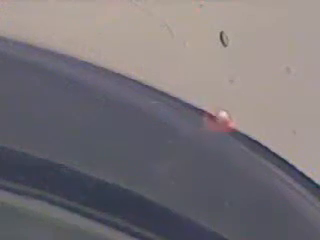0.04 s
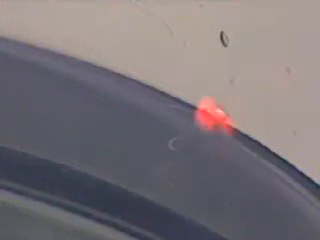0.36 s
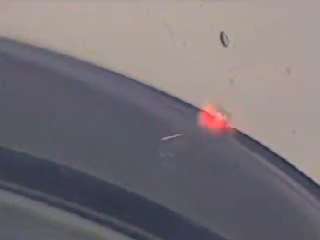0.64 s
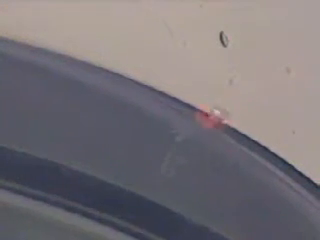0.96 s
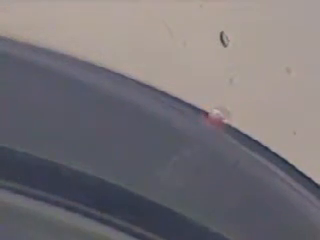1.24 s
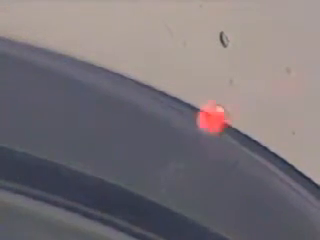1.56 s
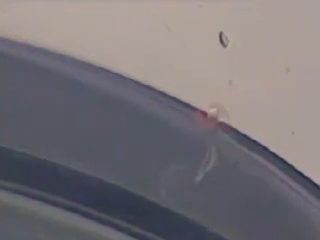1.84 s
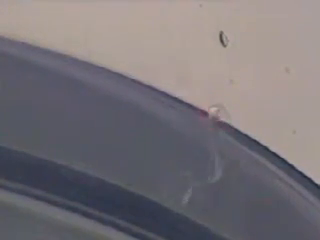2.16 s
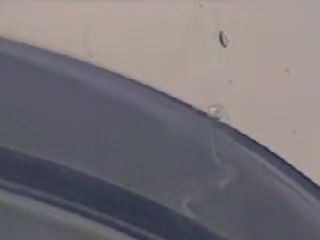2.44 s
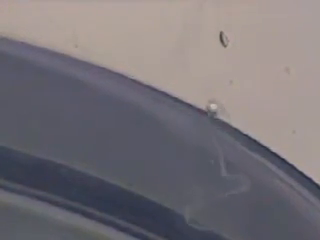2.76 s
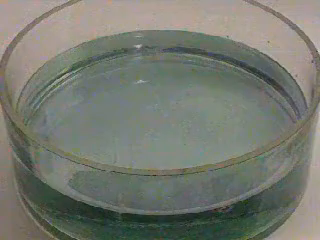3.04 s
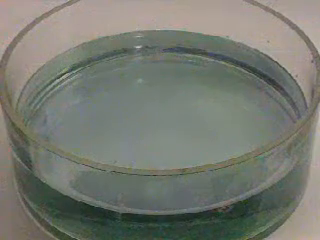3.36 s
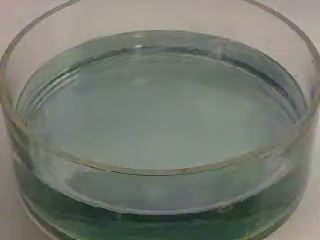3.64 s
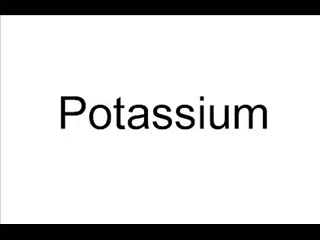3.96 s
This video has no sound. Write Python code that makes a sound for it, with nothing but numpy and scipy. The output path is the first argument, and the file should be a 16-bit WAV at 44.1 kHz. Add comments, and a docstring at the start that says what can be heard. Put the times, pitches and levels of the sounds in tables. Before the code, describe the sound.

A bead of reactive metal fizzes on water in a glass dish, close up, over a low room hum. Soft flame puffs and sharp droplet snaps dot the first second. The sizzle shifts tone at 1.4 and 3 seconds, sputters with more puffs around 2.3, then swells. At 3.4 seconds one loud, slightly distorted pop ends it, and a few specks tick faintly against the glass.

```python
"""A bead of reactive metal fizzes on water in a glass dish, near a small microphone in a humming room.
From the start, tiny gas bursts sizzle, the gas spurts, the flame puffs and droplets snap.
At 1.43 s and 3.03 s the sizzle changes colour abruptly.
At 3.41 s the bead ends in one overloading pop; then a few specks fall back and ring the glass."""
import sys
import numpy as np
from scipy import signal
from scipy.fft import rfft, irfft
from scipy.io import wavfile
from scipy.ndimage import map_coordinates

SR = 44100
rng = np.random.default_rng(int(sys.argv[2]) if len(sys.argv) > 2 else 0)


def file_out(sig):
    """Save sig as 16-bit WAV at sys.argv[1]."""
    # one column per channel
    cols = np.atleast_2d(sig).T
    # limit, then scale
    lim = np.clip(cols, -1, 1)
    pcm = np.round(lim * 32767).astype(np.int16)
    wavfile.write(sys.argv[1], SR, pcm)


N = 176400

# reaction vigour (time [s], level [dB])
VIGOUR = [(0, -26), (.15, -27), (.45, -26.5), (.6, -28.5), (.95, -27), (1.25, -29), (1.42, -27.5),
          (1.485, -31.5), (1.53, -27.5), (1.7, -23.5), (1.78, -26), (1.84, -30), (2.08, -29), (2.22, -33),
          (2.41, -33.5), (2.445, -21), (2.48, -25.5), (2.88, -24.5), (3.0, -26), (3.08, -28), (3.4, -29)]
# gas spurts (time [s], hold [s], level [dB])
SPURTS = [(0.303, 0.015, -28.5), (0.705, 0.016, -24.5), (1.492, 0.006, -23), (1.769, 0.012, -28),
          (1.909, 0.015, -22), (2.124, .007, -25), (2.255, 0.011, -20), (2.313, 0.006, -21),
          (2.371, 0.0087, -19), (2.578, 0.0042, -22.5), (3.048, 0.0097, -25)]
# sizzle echoes off the dish (delay [s], gain [ratio])
DISH_ECHOES = [(.00193, -0.2), (.0027, -0.04), (.00405, -0.065)]
# flame puffs (time [s], pitch [Hz], level [dB])
PUFFS = [(.0625, 600, -19.5), (0.1177, 460, -13.5), (.788, 450, -18.5), (.835, 415, -20),
         (0.8855, 434, -13), (1.006, 515, -17.5), (1.173, 456, -17.5), (1.918, 760, -19),
         (2.2693, 1020, -11), (2.277, 736, -15), (2.3284, 710, -11), (2.3427, 750, -17)]
# flame flutters (time [s], hold [s], level [dB])
FLUTTERS = [(0.113, 0.034, -30), (0.777, 0.041, -33), (0.882, 0.055, -35.5), (2.264, 0.012, -24.5),
            (2.287, 0.037, -37), (2.315, 0.04, -28.5)]
# droplets, then specks (time [s], level [dB], relative ring [dB], relative scatter [dB], low cut [Hz])
SNAPS = [(0.142, -13, -19.5, -6, 500), (.446, -13, -23.5, -7.5, 500), (.6472, 5.5, -45, -19.5, 1514),
         (.651, -1.5, -46, -9.5, 3000), (1.033, -3, -36, -15, 1500), (1.0539, 2.5, -25.5, -7.5, 450),
         (1.0554, -1, -50, -17, 700), (1.0893, 0.5, -55, -22, 3000), (1.493, -10, -45, -21, 500),
         (2.2643, -11, -34, -14, 500), (2.908, -15, -37, -25, 500), (3.563, -20, -34, -6.5, 3000),
         (3.664, -27, -40, -10, 1000), (3.711, -19.5, -37, -10.5, 1000)]
# glass modes (frequency [Hz], level [dB], T60 [s])
GLASS_MODES = [(2159, 9.5, 0.22), (3040, -9, 0.54), (3634, 3, 0.087), (3965, 1, 0.21), (4430, -5, 0.19),
               (7430, -0.5, 0.099), (8830, -1, 0.21)]
# mains harmonics 1-4 (level [dB])
HUM_DB = (-30.5, -45.5, -47, -47)
# hum swell (time [s], gain [dB])
HUM_SWELL = [(0, -0.5), (1.4, 0.5), (2.7, 0.5), (3.4, 1), (4, -2.5)]

# spectral shapes (frequency [Hz], relative level [dB])
SIZZLE_SPECTRUM = [(120, -7.5), (300, -2), (600, -1), (1000, -2), (1500, 0.5), (2500, -3), (4200, -1),
                   (7000, -5), (9000, -11.5), (9800, -11), (10500, -33), (11700, -43), (12500, -15),
                   (13200, -29)]
FLAME_SPECTRUM = [(100, 3.5), (300, 5.5), (600, -5), (900, -6.5), (1500, -1.5), (2500, -13), (4000, -28),
                  (10000, -32)]
SNAP_SPECTRUM = [(200, -5), (900, -6.5), (1300, 1), (1700, 3.5), (2500, 7.5), (3700, 2.5), (5500, -3),
                 (7500, -3.5), (9300, -8), (10800, -21), (14000, -11)]
POP_SPECTRUM = [(30, -5), (70, 2.5), (250, 4), (600, -2.5), (1300, -2.5), (2300, -1.5), (3300, -5),
                (5500, -12), (9000, -13.5), (11000, -16.5), (12600, -17)]
TAIL_SPECTRUM = [(80, -8.5), (250, -4), (700, 0.5), (1200, 0), (2500, -2.5), (6000, -3.5), (9500, 1.5),
                 (12500, -0.5)]
RUMBLE_SPECTRUM = [(20, -13.5), (48, -1), (70, -0.5), (100, -1.5), (150, -1.5), (210, -3), (300, -11),
                   (450, -17.5), (700, -23.5), (1500, -28.5), (4000, -33), (9000, -38.5), (11000, -39),
                   (12500, -36.5)]
HISS_SPECTRUM = [(20, 14), (11500, -12), (13000, -14), (14000, -46)]
# overall band limit, with a hollow near 11 kHz (frequency [Hz], gain [dB])
BAND_SHAPE = [(20, -25), (45, 0), (9300, -1.5), (10700, -12.5), (11700, -9), (12700, 3.5), (13400, -50),
              (16000, -55)]

# peaks and dips of the dish (centre [Hz], width [Hz], gain [dB])
COLOUR_1_PEAKS = [(755, 23, 8), (883, 200, -6.5), (1130, 81, 4.5), (1740, 70, -9), (1946, 103, 9.5),
                  (2196, 164, 6.5), (2420, 44, -7), (2680, 90, 2), (3000, 48, -9), (3220, 64, -9),
                  (3880, 400, 2), (4820, 180, -4)]
COLOUR_2_PEAKS = [(593, 236, -6.5), (820, 110, 0.5), (990, 70, -4), (1500, 160, 2), (1970, 85, -4),
                  (2300, 104, 7.5), (2550, 210, 5.5), (2945, 120, -4.5), (3420, 160, 3.5)]
COLOUR_3_PEAKS = [(834, 120, 0), (1260, 113, -14), (2370, 810, 4.5), (3200, 130, 0), (3490, 150, -8),
                  (4230, 300, 2.5)]
RIM_PEAKS = [(8000, 200, -2), (8750, 220, 5)]  # common to all three sizzle colours
SNAP_PEAKS = [(2190, 120, 1.5), (3020, 210, -8.5), (3990, 280, 4), (4900, 200, -2), (6990, 300, 3),
              (7950, 200, -5)]
POP_PEAKS = [(316, 32, -5), (418, 37, 5.5), (520, 27, -2), (596, 47, 6.5), (700, 37, -11), (790, 54, 9),
             (957, 25, 7.5), (1156, 30, 6), (1190, 38, -6.5), (1586, 96, 1), (1780, 37, 5), (1906, 39, 4),
             (2035, 24, 6), (2140, 45, 1.5), (2350, 60, 2), (2402, 60, 2), (2645, 43, 4.5)]
# room resonances (centre [Hz], width [Hz], gain [dB])
ROOM_PEAKS = [(144.3, 13, 4.5), (401, 31, 2)]

CUTS_S, POP_S = (1.43, 3.03), 3.4108
DRIFT_PER_S = (-.085, .033, .001)  # relative glide of each sizzle colour
TIME_S = np.arange(N) / SR


def undb(db):
    """Decibels to gain."""
    return 10 ** (np.asarray(db) / 20)


def unit(x):
    """Scale to rms 1."""
    return x / np.sqrt(np.mean(x ** 2))


def colour(x, spectrum=((1, 0),), peaks=()):
    """Minimum-phase filter: spectrum (default flat) plus bell-shaped peaks and dips."""
    bins_hz = np.arange(N + 1) * SR / (2 * N)
    hz, db = np.array(spectrum).T
    curve_db = np.interp(np.log(bins_hz + 1), np.log(hz), db)
    curve_db += sum(gain * np.exp(-((bins_hz - centre) / width) ** 2) for centre, width, gain in peaks)
    cepstrum = irfft(np.log(undb(curve_db)))
    cepstrum[1:N] *= 2
    cepstrum[N + 1:] = 0
    return irfft(rfft(x, 2 * N) * np.exp(rfft(cepstrum)))[:N]


def noise(spectrum, peaks=()):
    """Coloured noise, rms 1."""
    return unit(colour(rng.standard_normal(N), spectrum, peaks))


def walk(rate_hz):
    """Random wander, spread near 1."""
    knots = rng.standard_normal(4096)
    return np.interp(TIME_S * rate_hz, np.arange(len(knots)), knots)


def gate(start_s, hold_s, attack_s, release_s):
    """Linear rise; exponential release from hold_s after the start."""
    age_s = TIME_S - start_s
    return np.clip(age_s / attack_s, 0, 1) * np.exp(-np.maximum(age_s - hold_s, 0) / release_s)


def glide(x, drift_per_s, centre_s):
    """Slide all frequencies linearly; unchanged at centre_s."""
    read_s = TIME_S + drift_per_s * (TIME_S - centre_s) ** 2 / 2
    return map_coordinates(x, [read_s * SR], mode="mirror")


def add(out, start_s, sound):
    """Mix in at start_s."""
    i = int(start_s * SR)
    out[i:i + len(sound)] += sound[:N - i]


def gas(bursts_per_s=2600, spread_db=2.5, hiss_db=-5.5):
    """Tiny bursts over gas hiss, with short echoes off the dish."""
    sizes = undb(spread_db * np.minimum(rng.exponential(size=N), 5)) * rng.choice([-1, 1], N)
    bursts = unit((rng.random(N) < bursts_per_s / SR) * sizes)
    direct = bursts + undb(hiss_db) * rng.standard_normal(N)
    return direct + sum(gain * np.interp(TIME_S - delay_s, TIME_S, direct, left=0)
                        for delay_s, gain in DISH_ECHOES)


def singing(start_hz=2322, width_hz=105, fade_s=0.7):
    """Resonance by the bead: narrow noise that sinks and fades."""
    band_hz = [start_hz - width_hz / 2, start_hz + width_hz / 2]
    bandpass = signal.butter(2, band_hz, "band", fs=SR, output="sos")
    tone = unit(signal.sosfilt(bandpass, rng.standard_normal(N)))
    return glide(tone, DRIFT_PER_S[0], centre_s=0) * np.exp(-(TIME_S / fade_s) ** 2)


def sizzle():
    """Gas in three successive colours, switched abruptly; level follows vigour and spurts."""
    source = gas()
    out = undb(-4.5) * singing()
    edges_s = (0, *CUTS_S, POP_S)
    colours = (COLOUR_1_PEAKS, COLOUR_2_PEAKS, COLOUR_3_PEAKS)
    for start_s, end_s, peaks, drift in zip(edges_s, edges_s[1:], colours, DRIFT_PER_S):
        drifting = glide(colour(source, peaks=peaks), drift, (start_s + end_s) / 2)
        span = gate(start_s, end_s - start_s, attack_s=0.00072, release_s=0.0015)
        out += unit(colour(drifting, SIZZLE_SPECTRUM, RIM_PEAKS)) * span
    vigour = undb(np.interp(TIME_S, *np.array(VIGOUR).T) + 1.07 * walk(rate_hz=90))
    spurts = sum(undb(db) * gate(start_s, hold_s, attack_s=0.0024, release_s=0.0052)
                 for start_s, hold_s, db in SPURTS)
    return out * np.hypot(vigour, spurts)


def thump(age_s, start_hz=468, end_hz=115, glide_s=0.00294):
    """Low body of the pop: a sine dropping in pitch."""
    cycles = end_hz * age_s + (start_hz - end_hz) * glide_s * (1 - np.exp(-age_s / glide_s))
    return np.sin(2 * np.pi * cycles) * gate(POP_S, hold_s=0.017, attack_s=0.00082, release_s=0.0046)


def whistle(age_s, centre_hz=2390, fall_hz_per_s=62000, delay_s=0.012, width_s=0.005):
    """Falling zip inside the pop."""
    offset_s = age_s - delay_s
    cycles = offset_s * (centre_hz - fall_hz_per_s * offset_s / 2)
    return np.sin(2 * np.pi * cycles) * np.exp(-(offset_s / width_s) ** 2)


def pop(attack_s=0.0004, burn_s=0.021):
    """The bead bursts: roar of burning spray, crack, thump and zip."""
    age_s = np.maximum(TIME_S - POP_S, 0)
    burning = np.minimum(age_s / attack_s, 1) * np.exp(-(age_s / burn_s) ** 4)
    roar = noise(POP_SPECTRUM) * burning
    crack = noise(SNAP_SPECTRUM) * gate(POP_S, hold_s=0.0019, attack_s=0.00024, release_s=0.00078)
    chirp = whistle(age_s) * burning
    return undb(-5) * roar + undb(-3.5) * crack + undb(-6.5) * thump(age_s) + undb(-16) * chirp


def snaps(scatter_decay_s=0.007):
    """Droplets spit, specks land: a click, scatter inside the dish, ringing glass."""
    age_s = TIME_S[:SR]
    glass = sum(undb(db) * np.sin(2 * np.pi * hz * age_s) * undb(-60 * age_s / t60_s)
                for hz, db, t60_s in GLASS_MODES)
    scatter = np.exp(-age_s[:SR // 10] / scatter_decay_s)
    clicks, rings = np.zeros(N), np.zeros(N)
    for start_s, db, ring_db, scatter_db, cut_hz in SNAPS:
        click = undb(scatter_db) * rng.standard_normal(len(scatter)) * scatter
        click[0] = undb(8)  # direct impulse
        highpass = signal.butter(1, cut_hz, "high", fs=SR)
        add(clicks, start_s, undb(db) * signal.lfilter(*highpass, click))
        add(rings, start_s, undb(db + ring_db) * glass)
    return colour(clicks, SNAP_SPECTRUM, SNAP_PEAKS) + rings


def flame(puff_width_cycles=0.43):
    """Gas ignites: dull flutters and puffs of about one cycle."""
    flutters = sum(undb(db) * gate(start_s, hold_s, attack_s=0.0059, release_s=0.013)
                   for start_s, hold_s, db in FLUTTERS)
    out = noise(FLAME_SPECTRUM) * flutters
    for start_s, hz, db in PUFFS:
        cycles = hz * TIME_S[:SR // 20]
        window = np.exp(-((cycles - .5) / puff_width_cycles) ** 2)
        add(out, start_s, undb(db) * np.sin(2 * np.pi * cycles) * window)
    return out


def reverb(x, split_hz=3000, low_t60_s=0.56, high_t60_s=0.28):
    """Diffuse tail of a small room; treble dies first."""
    white = rng.standard_normal(N)
    low = signal.sosfilt(signal.butter(2, split_hz, fs=SR, output="sos"), white)
    low_decay = gate(0.011, hold_s=0, attack_s=0.016, release_s=low_t60_s / np.log(1000))
    high_decay = gate(0.0048, hold_s=0, attack_s=0.006, release_s=high_t60_s / np.log(1000))
    tail = low * low_decay + undb(5) * (white - low) * high_decay
    wet = signal.fftconvolve(x, tail / np.linalg.norm(tail))[:N]
    return colour(wet, TAIL_SPECTRUM)


def ventilation():
    """Low, wavering rumble with room resonances."""
    return noise(RUMBLE_SPECTRUM, ROOM_PEAKS) * undb(-32.5 + 0.74 * walk(rate_hz=9))


def hum(mains_hz=50.1):
    """Mains harmonics, swelling slowly."""
    phase = 2 * np.pi * mains_hz * TIME_S
    harmonics = np.sqrt(2) * sum(undb(db) * np.sin(k * phase) for k, db in enumerate(HUM_DB, 1))
    swell_db = np.interp(TIME_S, *np.array(HUM_SWELL).T) + 0.56 * walk(rate_hz=4.24)
    return harmonics * undb(swell_db)


def scene():
    """Close reaction, room tail and background; mono."""
    fizz = sizzle() + flame() + snaps()
    bang = pop()
    direct = fizz + colour(bang, peaks=POP_PEAKS)
    return (direct + undb(-10) * reverb(fizz + bang) + ventilation() + hum())[None]


def record(dry):
    """Band limit, faint hiss, clipping on the loudest peaks."""
    hiss = undb(-65) * noise(HISS_SPECTRUM)
    clipped = np.clip(colour(dry[0], BAND_SHAPE) + hiss, -1, 1)
    lowpass = signal.ellip(8, .2, 70, 15900, fs=SR, output="sos")
    return signal.sosfilt(lowpass, clipped)[None]


dry = scene()
out = record(dry)
file_out(out)
```